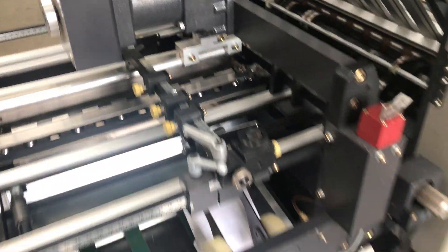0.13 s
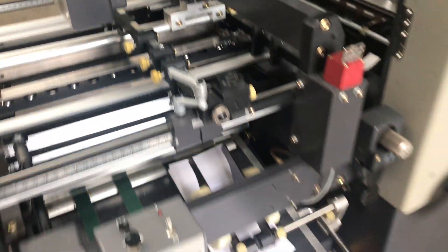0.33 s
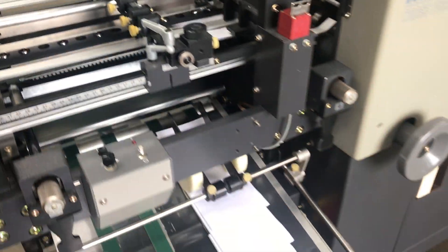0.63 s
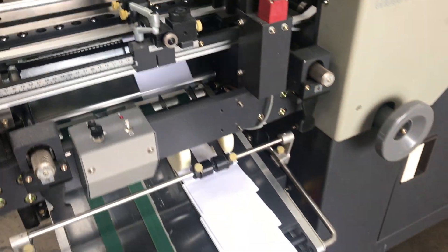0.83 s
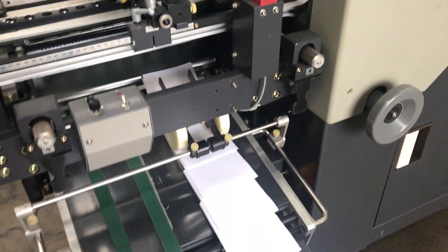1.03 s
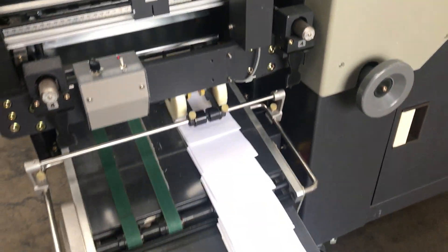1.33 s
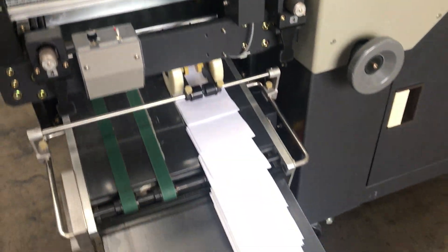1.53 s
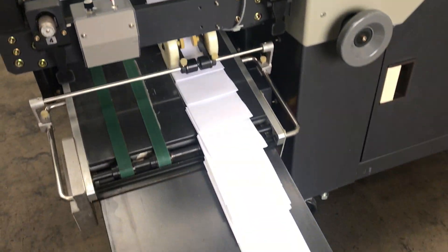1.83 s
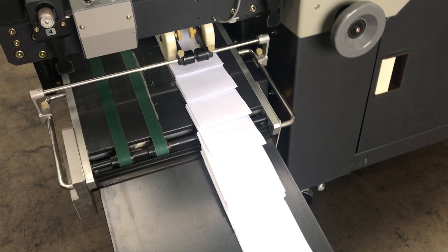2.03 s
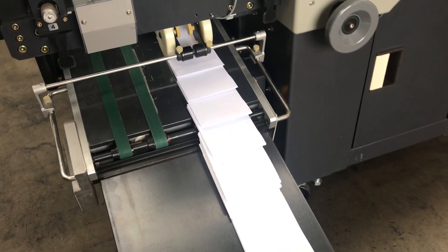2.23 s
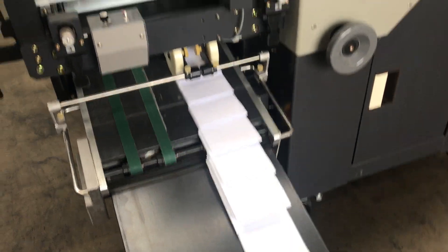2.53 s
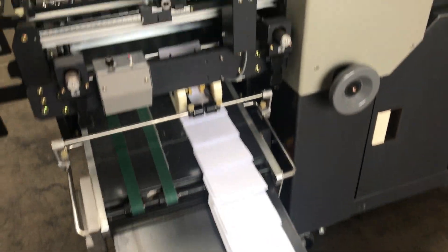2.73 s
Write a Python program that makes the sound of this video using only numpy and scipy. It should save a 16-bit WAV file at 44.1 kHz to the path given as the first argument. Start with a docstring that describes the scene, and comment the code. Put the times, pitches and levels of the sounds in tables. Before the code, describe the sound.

A paper folding machine whirs, with rhythmic paper snaps, metal clacks and light clinks.

```python
"""A workshop, one microphone close to a paper folding machine that takes a sheet about every 0.88 s.
Motor, belts and rollers whir from the start, and a sheet already folded cracks and slaps out.
Each of the next three snaps twice as it buckles in the fold rollers, then slides on under steel balls
that clink in their rail. Last the folding knife knocks down and pings on its stop, the crease cracks
and the sheet slaps onto the tray. The room adds a short, dull tail to each blow."""
import sys
import numpy as np
from scipy import signal
from scipy.fft import rfft, irfft, next_fast_len
from scipy.io import wavfile

SR = 44100
rng = np.random.default_rng(int(sys.argv[2]) if len(sys.argv) > 2 else 0)


def wrap_up_sound(samples):
    """Save the sound to the file named by the first command line argument, as 16-bit audio."""
    columns = np.atleast_2d(samples).T
    # keep every value between -1 and 1, then stretch to whole-number steps
    tamed = np.clip(columns, -1, 1)
    steps = np.round(tamed * 32767).astype(np.int16)
    wavfile.write(sys.argv[1], SR, steps)


N = 127449
TIME = np.arange(N) / SR
CYCLE_S = 0.879

# belts and bearings: (frequency [Hz], relative level [dB])
WHIR_SPECTRUM = [(45, -23), (94, -9), (165, -12), (194, -4.5), (228, -17), (270, -5), (480, -13.5),
                 (1120, -13), (2730, -19.5), (15800, -27)]
# motor and gear tones: (frequency [Hz], rms level [dB])
MOTOR_TONES = [(109, -50.5), (174, -49), (301.5, -46), (500, -45.5), (534.7, -45.5), (646, -51),
               (1118, -47), (2045, -48.5)]
# hiss of travelling paper: (time in the cycle [s], level [dB])
SLIDE_LEVELS = [(0, -25), (.15, -73), (.53, -41), (.63, -35), (.879, -35.5)]
# a sheet enters the rollers: (time [s], gain [dB])
SHEETS = [(-.549, 0), (0.33, -1.5), (1.2086, -4), (2.0881, -7)]

# a sheet buckles into the first fold, then springs back and takes the second:
# (time [s], level [dB], pitch factor)
FIRST_FOLDS = [(.3315, -13, 0.97), (1.2112, -16, 1.2), (2.0888, -16.5, 1.01)]
SECOND_FOLDS = [(.3752, -23, 1.15), (.4502, -14.5, 1.07), (1.2225, -24, 1.17), (1.2562, -25, 1.1),
                (1.3315, -17.5, 1.06), (2.1335, -26, 1.17), (2.2095, -18.5, 0.9)]
# it flutters between the rollers, makes them drum, scuffs the guide and swishes under the first ball:
# (time after entering [s], level [dB], length [s])
FLUTTERS = [(.203, -26.5, 0.023)]
THRUMS = [(.003, -32.5, .065), (.2, -30.5, .11), (.515, -30.5, .035)]
SCUFFS = [(.305, -19, 0.029), (.553, -15.5, 0.0032)]
SWISHES = [(.345, -26.5, 0.015)]
# its edge flicks the paper stop: (time after entering [s], level [dB])
FLICKS = [(.4485, -16)]
# steel balls drop off its tail: (time [s], level [dB])
CLINKS = [(.6965, -16.5), (.7415, -19.5), (.786, -21.5), (1.579, -20), (1.6235, -24), (1.669, -27.5),
          (2.4535, -19), (2.498, -23.5), (2.543, -27)]
# the rail that holds the balls: (frequency [Hz], relative level [dB])
RAIL_MODES = [(4183, -21), (5290, -20), (6165, -16), (7060, -7), (7995, -14), (8982, -5), (9265, -14),
              (10065, -5), (11195, -9), (12450, -9)]
# a loose piece of steel: (time [s], level [dB], frequency [Hz], t60 [s])
CHINKS = [(1.531, -24, 5285, .12)]

# the knife knocks, the crease cracks in the nip, the sheet slaps out, the tray is tapped:
# (time [s], level [dB])
KNOCKS = [(.8402, -14.5), (1.7217, -14.5), (2.5957, -14.5)]
CRACKS = [(.0188, -9), (.899, -19), (1.780, -11), (2.6545, -14.5)]
SLAPS = [(.0425, -12.5), (.9222, -14), (1.8029, -17), (2.677, -16.5)]
TRAY_TAPS = [(1.807, -29)]
# the knife hits its steel stop:
# (time [s], contact [dB], blade ring [dB], stop's lower mode [dB], stop's upper mode [dB])
PINGS = [(.852, -16, -23, -15, -24), (.8588, -20, -32, -35, -8.5), (1.733, -23, -19, -16.5, -14.5),
         (2.6072, -19.5, -27, -24, -18)]
# the ring of that stop: (frequency [Hz], t60 [s])
STOP_MODES = [(11858, .13), (14445, .075)]
# paper guide, knife carrier, blade and tray ring: (frequency [Hz], relative level [dB], t60 [s])
GUIDE_MODES = [(7440, -3, .06), (8100, -1, .06)]
CARRIER_MODES = [(1020, 7, 0.026), (1576, -3, 0.018)]
BLADE_MODES = [(2692, -1, .1), (5120, -12, .12), (7700, -5, .09)]
TRAY_MODES = [(904, 0, .15), (1206, -2, .11)]

# spectra of the fold snaps at pitch factor 1: (frequency [Hz], relative level [dB])
FIRST_FOLD_SPECTRUM = [(700, -9), (1600, 1.5), (3200, 3), (6500, -8.5), (15500, -22.5)]
SECOND_FOLD_SPECTRUM = [(650, 1), (1300, 8), (2600, 3), (5500, -8.5), (15500, -25.5)]
# spectra of the rubs and blows, heard close up: (frequency [Hz], relative level [dB])
SLIDE_SPECTRUM = [(500, 7.5), (4000, 4.5), (15500, -4.5)]
FLUTTER_SPECTRUM = [(800, -0.5), (1700, -2.5), (15000, -41)]
THRUM_SPECTRUM = [(110, -7), (178, 0.5), (240, -10.5), (2000, -33.5)]
SCUFF_SPECTRUM = [(3500, -5.5), (15500, -1.5)]
SWISH_SPECTRUM = [(7000, 1), (15500, -3.5)]
FLICK_SPECTRUM = [(2600, -7.5), (4620, 1), (15000, -12)]
CLINK_SPECTRUM = [(2600, -19), (7170, -15.5), (15500, -14.5)]
KNOCK_SPECTRUM = [(850, 0.5), (3300, 3), (5500, -9.5), (15000, -19)]
PING_SPECTRUM = [(450, 13), (2640, 3), (9000, 3), (15000, -13)]
CRACK_SPECTRUM = [(450, 8.5), (900, -4.5), (1500, 6), (2100, -2.5), (3100, 9), (4200, -4), (15000, -18)]
SLAP_SPECTRUM = [(550, 5.5), (2100, 3), (12800, -7.5), (15000, -15)]


def from_db(db):
    return 10 ** (np.asarray(db) / 20)


def unit_rms(x):
    return x / np.sqrt(np.mean(x ** 2) + 1e-20)


def drift(rate_hz):
    """A smooth random wander with a spread of 1."""
    step, settle = 40, 2000  # samples a point; points for the filter to settle
    pole = np.exp(-2 * np.pi * rate_hz * step / SR)
    noise = rng.standard_normal(N // step + settle + 2)
    slow = signal.lfilter([1], [1, -2 * pole, pole * pole], noise)[settle:]
    return np.interp(np.arange(N) / step, np.arange(len(slow)), unit_rms(slow))


def coloured(x, spectrum, skirt_db=12):
    """Causal filter of unit power with this spectrum; below it the level falls by skirt_db an octave."""
    size = 2 * next_fast_len(N // 2 + SR // 4)
    octave = np.log2(np.maximum(np.arange(size // 2 + 1) * SR / size, 10))
    hz, db = np.transpose(spectrum)
    octaves_below = np.maximum(np.log2(hz[0]) - octave, 0)
    gain = unit_rms(from_db(np.interp(octave, np.log2(hz), db) - skirt_db * octaves_below))
    # minimum phase: nothing sounds ahead of a blow
    cepstrum = irfft(np.log(gain))
    cepstrum[1:size // 2] *= 2
    cepstrum[size // 2 + 1:] = 0
    return irfft(rfft(x, size) * np.exp(rfft(cepstrum)))[:N]


def envelope(start_s, rise_s, hold_s, t60_s):
    """Rise, hold and die away."""
    age = TIME - start_s
    return np.clip(age / rise_s, 0, 1) * from_db(-60 * np.maximum(age - hold_s, 0) / t60_s)


def grains(grain_db):
    """Dense tiny contacts whose strength flickers from millisecond to millisecond."""
    return unit_rms(rng.standard_normal(N) * from_db(grain_db * drift(670)))


def clicks(times_s, db):
    """Single impulses at these times and strengths."""
    force = np.zeros(N)
    force[(times_s * SR).astype(int)] = from_db(db)
    return force


def resonate(force, hz, t60_s):
    """One mode: a unit click sets a sine of height 1 ringing."""
    pole, angle = from_db(-60 / (t60_s * SR)), 2 * np.pi * hz / SR
    return signal.lfilter([0, np.sin(angle)], [1, -2 * pole * np.cos(angle), pole * pole], force + 1e-18)


def ringing(rows, modes, spread_db):
    """Every blow sets every mode ringing with a strength of its own."""
    times_s, db = np.transpose(rows)
    scatter_db = spread_db * rng.standard_normal((len(rows), len(modes)))
    return sum((-1) ** k * resonate(clicks(times_s, db + mode_db + scatter_db[:, k]), hz, t60)
               for k, (hz, mode_db, t60) in enumerate(modes))


def blows(rows, spectrum, click_db, rise_s, hold_s, t60_s):
    """Each blow is one sharp click and a short dying crush of contacts."""
    force = grains(grain_db=2) * sum(from_db(db) * envelope(s, rise_s, hold_s, t60_s) for s, db in rows)
    for s, db in rows:
        force[int(s * SR)] += from_db(db + click_db)
    return coloured(force, spectrum)


def rubs(rows, spectrum, rise_s, t60_s, grain_db):
    """Longer contacts that swell and fade."""
    pressure = sum(from_db(db) * envelope(s, rise_s, length_s, t60_s) for s, db, length_s in rows)
    return coloured(grains(grain_db) * pressure, spectrum)


def snaps(rows, spectrum, **shape):
    """Paper snaps, each with its spectrum shifted by its own pitch."""
    return sum(blows([(s, db)], [(hz * pitch, level) for hz, level in spectrum], **shape)
               for s, db, pitch in rows)


def each_sheet(rows):
    """The same steps for every sheet, at that sheet's time and strength."""
    return [(enter_s + s, sheet_db + db, *rest)
            for enter_s, sheet_db in SHEETS for s, db, *rest in rows if enter_s + s > 0]


def workshop(sound, gain_db=-10, dull_hz=4800):
    """The walls send a short, dull, diffuse tail back to the microphone."""
    tail = rng.standard_normal(N) * envelope(0, rise_s=0.012, hold_s=0.01, t60_s=0.35)
    tail = signal.sosfilt(signal.butter(1, dull_hz, fs=SR, output="sos"), tail / np.linalg.norm(tail))
    return from_db(gain_db) * signal.fftconvolve(sound, tail)[:N]


def motor(waver_db=2.5, waver_radians=1.0):
    """Motor and gear tones waver in level and phase behind the action."""
    return sum(np.sqrt(2) * from_db(db + waver_db * drift(5.0))
               * np.sin(2 * np.pi * hz * TIME + waver_radians * drift(3.7)) for hz, db in MOTOR_TONES)


def belts(whir_db=-32.5, flicker_db=0.56, load_share=0.021):
    """Paper hisses as it travels; belts and bearings whir, slightly louder under its load."""
    slide_db = np.interp(TIME % CYCLE_S, *np.transpose(SLIDE_LEVELS))
    load_db = load_share * (slide_db - slide_db.mean())
    whir_gain = from_db(whir_db + load_db + flicker_db * drift(0.68))
    whir = whir_gain * coloured(grains(grain_db=2), WHIR_SPECTRUM)
    hiss = from_db(slide_db) * coloured(grains(grain_db=2.5), SLIDE_SPECTRUM)
    return whir + hiss


def paper_guide(ring_db=-29.5):
    """The sheet scuffs the guide and sets it singing, swishes under the first ball and flicks the stop."""
    scuff = rubs(each_sheet(SCUFFS), SCUFF_SPECTRUM, rise_s=0.0095, t60_s=0.038, grain_db=2)
    ring = sum(resonate(from_db(ring_db + db) * scuff, hz, t60) for hz, db, t60 in GUIDE_MODES)
    swish = rubs(each_sheet(SWISHES), SWISH_SPECTRUM, rise_s=0.002, t60_s=0.05, grain_db=2)
    flick = blows(each_sheet(FLICKS), FLICK_SPECTRUM,
                  click_db=8, rise_s=0.00097, hold_s=0.0015, t60_s=0.055)
    return scuff + ring + swish + flick


def ball_rail(ring_db=5.5, t60_cycles=700):
    """Steel balls drop off the sheet's tail and ring their rail; a loose piece of steel chinks once."""
    clink = blows(CLINKS, CLINK_SPECTRUM, click_db=-7, rise_s=0.0011, hold_s=0.0063, t60_s=0.029)
    modes = [(hz, ring_db + db, t60_cycles / hz) for hz, db in RAIL_MODES]
    rail = ringing(CLINKS, modes, spread_db=2.5)
    chink = sum(resonate(clicks(np.array([s]), db), hz, t60) for s, db, hz, t60 in CHINKS)
    return clink + rail + chink


def fold_rollers():
    """Buckling paper snaps, first bright, then duller; the sheet flutters and the rollers drum."""
    first = snaps(FIRST_FOLDS, FIRST_FOLD_SPECTRUM,
                  click_db=7, rise_s=0.0012, hold_s=0.0075, t60_s=0.025)
    second = snaps(SECOND_FOLDS, SECOND_FOLD_SPECTRUM,
                   click_db=13, rise_s=0.0017, hold_s=0.0072, t60_s=0.046)
    flutter = rubs(each_sheet(FLUTTERS), FLUTTER_SPECTRUM, rise_s=0.0077, t60_s=0.17, grain_db=0.5)
    thrum = rubs(each_sheet(THRUMS), THRUM_SPECTRUM, rise_s=0.01, t60_s=0.25, grain_db=3.5)
    return first + second + flutter + thrum


def sheet_exit():
    """The crease cracks in the nip and the folded sheet slaps onto the tray, which rings once."""
    crack = blows(CRACKS, CRACK_SPECTRUM, click_db=14.5, rise_s=0.00039, hold_s=0.00033, t60_s=0.02)
    slap = blows(SLAPS, SLAP_SPECTRUM, click_db=4, rise_s=0.0011, hold_s=0.0033, t60_s=0.056)
    return crack + slap + ringing(TRAY_TAPS, TRAY_MODES, spread_db=1)


def knife():
    """The knife knocks down, its carrier thuds, then blade and steel stop meet and both ring."""
    knock = blows(KNOCKS, KNOCK_SPECTRUM, click_db=12, rise_s=0.0003, hold_s=0.002, t60_s=0.045)
    carrier = ringing(KNOCKS, CARRIER_MODES, spread_db=1)
    times_s, contact_db, blade_db, *stop_db = np.transpose(PINGS)
    contact = blows(list(zip(times_s, contact_db)), PING_SPECTRUM,
                    click_db=20, rise_s=0.00054, hold_s=0.0044, t60_s=0.051)
    blade = ringing(list(zip(times_s, blade_db)), BLADE_MODES, spread_db=0.5)
    stop = sum(resonate(clicks(times_s, db), hz, t60) for db, (hz, t60) in zip(stop_db, STOP_MODES))
    return knock + carrier + contact + blade + stop


def scene():
    """The machine at close range, one microphone feeding both channels."""
    action = paper_guide() + ball_rail() + fold_rollers() + sheet_exit() + knife()
    return np.tile(workshop(action) + motor() + belts() + action, (2, 1))


def record(dry, cutoff_hz=15900):
    """The recorder rounds the peaks and cuts the top treble steeply."""
    lowpass = signal.ellip(12, 0.1, 80, cutoff_hz, fs=SR, output="sos")
    return signal.sosfilt(lowpass, np.tanh(dry))


dry = scene()
out = record(dry)
wrap_up_sound(out)
```